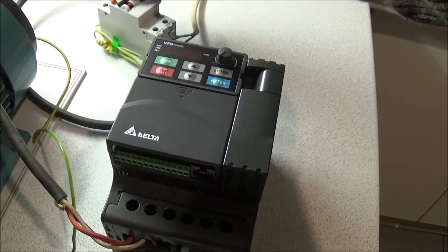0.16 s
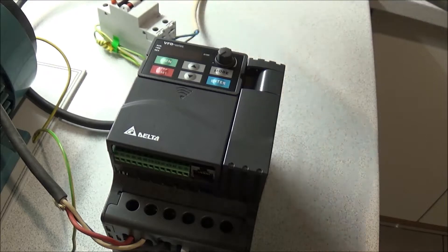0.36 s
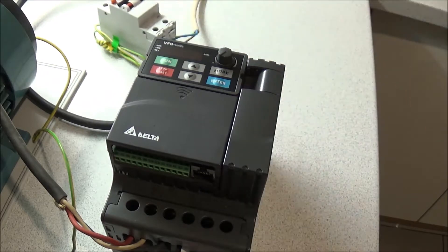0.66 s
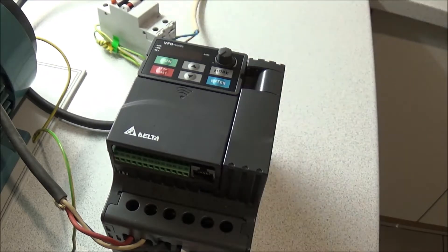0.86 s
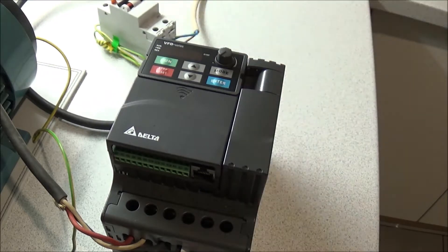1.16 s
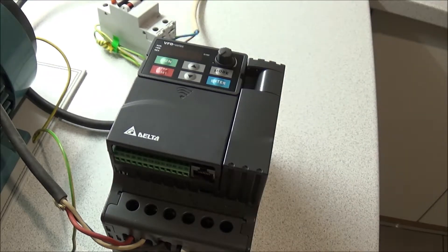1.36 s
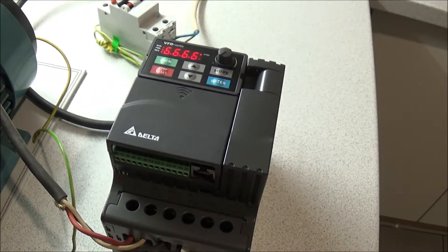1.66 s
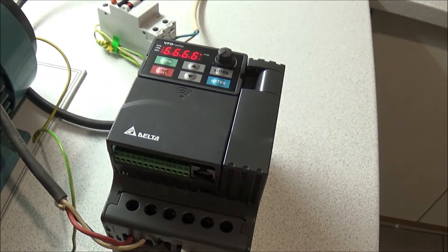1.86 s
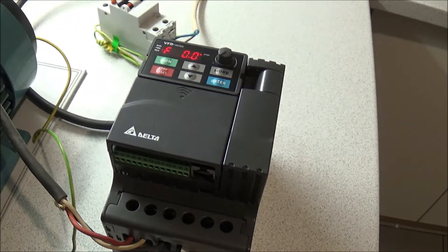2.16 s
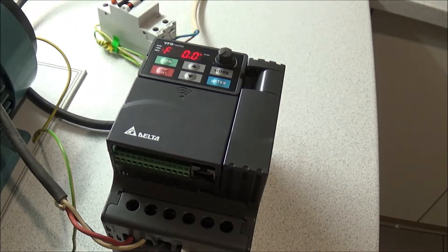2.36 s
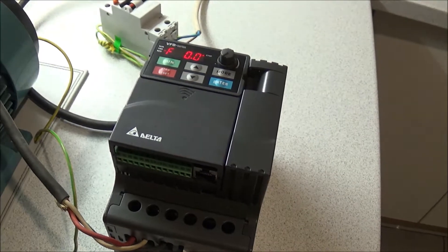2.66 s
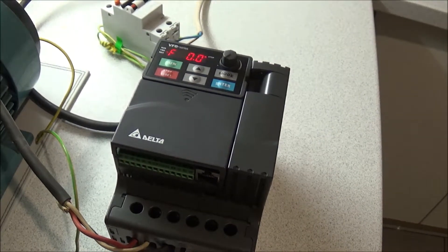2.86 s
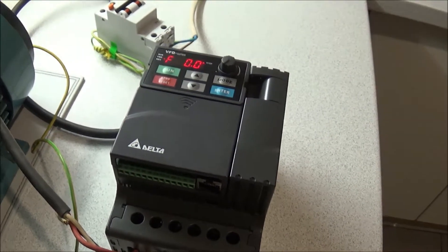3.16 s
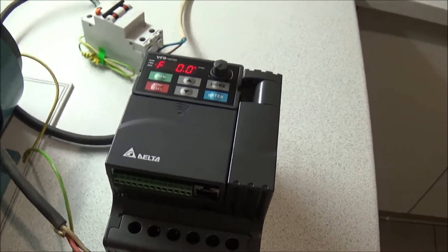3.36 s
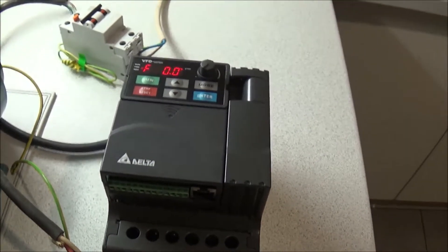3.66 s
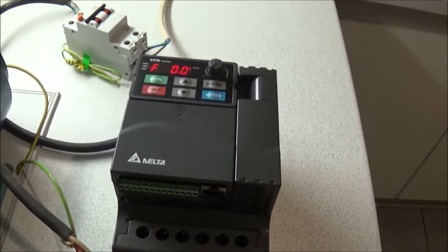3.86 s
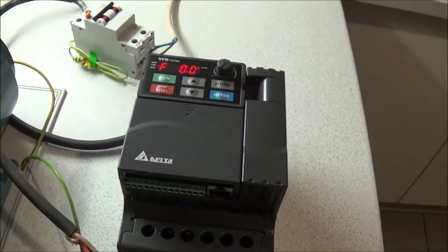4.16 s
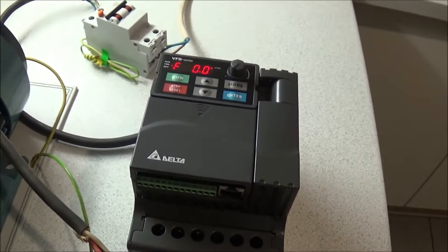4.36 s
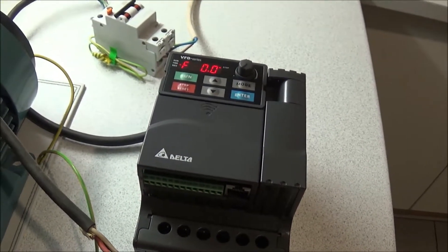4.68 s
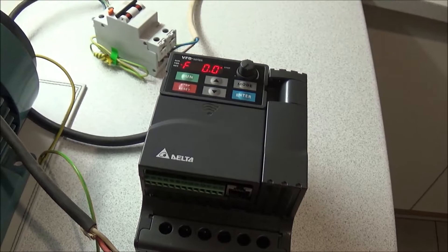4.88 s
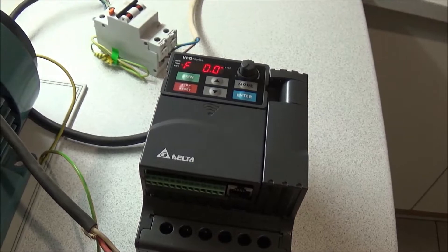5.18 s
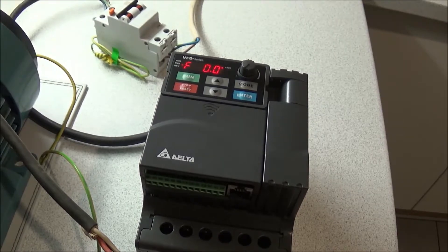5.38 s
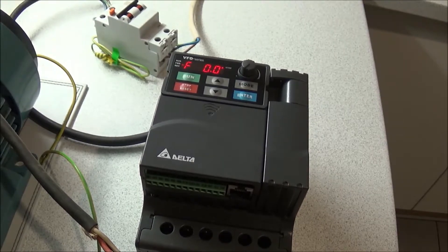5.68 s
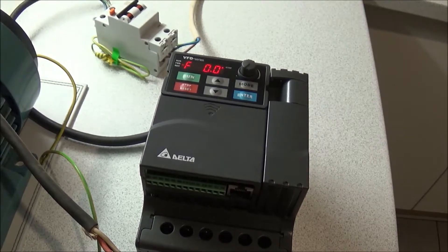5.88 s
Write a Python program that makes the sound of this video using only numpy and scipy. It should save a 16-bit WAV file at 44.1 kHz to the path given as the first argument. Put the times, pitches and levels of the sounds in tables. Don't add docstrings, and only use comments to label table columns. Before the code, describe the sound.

A handheld stereo microphone listens close to a bench in a hard-walled workshop. At 0 s the echo of a breaker snap is already dying, mostly gone within a second, leaving soft hiss and a very faint hum. At about 1.93 s a relay clacks: a hard, bright metallic-plastic click with several bounces inside 15 milliseconds and a short ringing echo. From about 2.1 s a small fan spins up, pitch gliding quickly then flattening near 640 Hz by 4-5 s, with a faint buzz early on and turbulent hiss growing. A light hollow knock comes at 2.63 s. From 2.95 to 3.5 s the grip stutters in rapid ticks and jolts, then heavier bumps and low rumble until 3.95 s. The fan holds steady, slowly nearer, with sharp ticks around 4.5 and 4.75 s, bumps at 4.6 and 5.6 s, and a loud tick at 5.94 s.

```python
import sys
import numpy as np
from scipy import signal
from scipy.io import wavfile
from scipy.ndimage import uniform_filter1d

SR = 44100
rng = np.random.default_rng(int(sys.argv[2]) if len(sys.argv) > 2 else 0)


def level_to_linear(level):
    exponent = np.asarray(level, float) / 20
    return 10 ** exponent


def wrap_up_sound(samples):
    columns = np.atleast_2d(samples).T
    tamed = np.clip(columns, -1, 1)
    steps = np.round(tamed * 32767).astype(np.int16)
    wavfile.write(sys.argv[1], SR, steps)


N = 265790
TIME = np.arange(N) / SR

# frequency in Hz, likeness from 0 to 1.
ROOM_SAME = [(60, 0.81), (150, 1), (380, 0.6), (950, 0.81), (2380, 0.79), (5980, 0.74), (15000, 1)]
# start in seconds, peak level in dB.
RELAY_BLOWS = [
    (1.9262, -33),
    (1.9281, -11),
    (1.9292, -2.5),
    (1.9321, -8.5),
    (1.9338, -15),
    (1.9362, -11),
    (1.9385, -19),
    (1.9404, -18),
]
# time in seconds, level in dB.
NEAR = [(2.2, -3), (3.3, -4.5), (4.14, -2.5), (4.45, -1.5), (4.75, -0.85), (5.4, -0.3), (6.03, 0)]
# start in seconds, tick level in dB, jolt level in dB, jolt pitch in Hz.
SLIPS = [(2.948, -60, -33, 226), (3.004, -37, -40, 208), (3.061, -35, -35, 241), (3.107, -31.5, -24, 294),
         (3.153, -34, -34, 207), (3.198, -51.5, -35, 191), (3.252, -37, -29, 229), (3.296, -30, -25, 218),
         (3.345, -31.5, -27, 292), (3.388, -29, -23.5, 202), (3.43, -30, -24, 205), (3.472, -35, -25, 162)]


def evened(x):
    return x / np.sqrt(np.mean(x ** 2) + 1e-20)


def read(points, hz):
    f, value = np.transpose(points)
    return np.interp(np.log(hz + 1), np.log(f + 1), value)


def lifted(bands, hz):
    return sum(db / (1 + (2 * (hz - f) / width) ** 2) for f, width, db in bands)


def played(table, column):
    s, db = np.transpose(table)[[0, column]]
    return level_to_linear(np.interp(TIME, s, db)) * np.clip((TIME - s[0]) / 0.13, 0, 1)


def add(mix, s, sound):
    part = mix[..., max(round(s * SR), 0):][..., :sound.shape[-1]]
    part += sound[..., :part.shape[-1]]


def band(x, lo_hz, hi_hz):
    edges = [lo_hz, min(hi_hz, SR / 2.2)]
    return signal.sosfilt(signal.butter(2, edges, "band", fs=SR, output="sos"), x)


def wander(top_hz):
    smooth = signal.butter(2, top_hz, fs=SR, output="sos")
    return evened(signal.sosfiltfilt(smooth, rng.standard_normal(N)))


def noise(colour_db, same, size, lead=0, patchy_db=0):
    frames = 4 * N // size + 5
    hz = np.fft.rfftfreq(size, 1 / SR)[:, None]
    a, b, c, d, patches = rng.standard_normal((frames, len(hz), 5)).T
    patches = evened(uniform_filter1d(uniform_filter1d(patches, 9, 0), 11, 1))
    like = np.clip(read(same, hz), -1, 1)
    lag = read(lead, hz) if lead else 0
    left = a + 1j * b
    right = like * left * np.exp(-1j * lag) + np.sqrt(1 - like ** 2) * (c + 1j * d)
    gain = level_to_linear(colour_db(hz, np.arange(frames) * size / 4 / SR)) * np.ones(frames)
    gain /= np.sqrt(1.5 * (gain ** 2).sum(0).max())
    spectra = np.array([left, right]) * gain * level_to_linear(patchy_db * patches)
    return signal.istft(spectra, nperseg=size, noverlap=3 * size // 4)[1][:, :N]


def echo(s, db, colour, bands, t60):
    def colour_db(hz, t):
        return read(colour, hz) + lifted(bands, hz) - 60 * np.maximum(t - s, 0) / read(t60, hz)

    onset = np.sin(np.pi / 2 * np.clip((TIME - s) / 0.0025, 0, 1)) ** 2
    return level_to_linear(db) * noise(colour_db, ROOM_SAME, size=1024) * onset


def ring(modes):
    t = np.arange(4000) / SR
    swing_in = (1 - np.exp(-t / .00035)) ** 2
    return swing_in * sum(level_to_linear(db - 60 * t / t60) * np.sin(2 * np.pi * hz * t) for hz, db, t60 in modes)


def crunch(seconds):
    size = round(seconds * SR)
    main = np.arange(size) == size // 2
    return main + .15 * signal.windows.hann(size) * rng.standard_normal(size)


def struck(modes, seconds, lo_hz, hi_hz):
    sound = np.convolve(crunch(seconds), ring(modes))
    sound = band(band(sound, lo_hz, hi_hz), lo_hz, hi_hz)
    return sound / abs(sound).max()


def blade_hz(t):
    start_s, top_hz, spin_up_s, sag_hz_per_s = 2.061, 642.2, .5516, 1.08
    since = np.maximum(t - start_s, .01)
    return top_hz * (1 - np.exp(-since / spin_up_s)) - sag_hz_per_s * since


def speed_db(t):
    return 20 * np.log10(blade_hz(t) / blade_hz(TIME[-1]))


def settling_db(hz, t):
    dip_db, length_s, edge_hz = -4.5, .8, 1500
    since = t - np.array([[0], [RELAY_BLOWS[1][0]]])
    dips = np.exp(-(since / length_s) ** 4) * (since >= 0)
    return dip_db * dips.sum(0) / (1 + (edge_hz / (hz + 1)) ** 2)


def room():
    # frequency in Hz, level in dB.
    far_hum = [(48.4, -66), (118.4, -74), (172.3, -72), (199.2, -68), (301.5, -70)]
    # frequency in Hz, density in dB per Hz.
    air_colour = [(15, -30), (30, -11), (60, -20), (140, -15), (200, -11), (260, -18), (500, -16),
                  (800, -20), (1700, -21.5), (3500, -25.5), (8000, -26), (10500, -29.5), (15700, -38)]
    hum = 0
    for hz, db in far_hum:
        hum += np.sqrt(2) * level_to_linear(db + hz / 90 * wander(2.5)) * np.sin(2 * np.pi * hz * TIME)

    def colour_db(hz, t):
        return read(air_colour, hz) + settling_db(hz, t)

    return level_to_linear(-49) * noise(colour_db, ROOM_SAME, size=2048, patchy_db=.7) + hum


def breaker_echo():
    # frequency in Hz, density in dB per Hz.
    snap_colour = [(24, -61), (40, -36), (103, -35), (129, -28), (193, 2.5), (267, -15), (335, -7.5),
                   (566, -5), (610, -2), (1000, -6), (1110, -0.5), (2530, -23), (8200, -28), (14200, -56),
                   (15700, -66)]
    # frequency in Hz, width in Hz, lift in dB.
    snap_bands = [(1200, 200, 2.6), (1760, 300, 2.6), (2040, 340, 2.5), (4930, 270, 2.8)]
    # frequency in Hz, time to fall by 60 dB in seconds.
    snap_t60 = [(60, 0.67), (250, 0.68), (800, 0.76), (1250, 0.79), (2000, 0.94), (3000, 0.96),
                (8000, 0.55), (15000, 0.46)]
    return echo(-.01, -17.5, snap_colour, snap_bands, snap_t60)


def shell_ticks():
    # start in seconds, peak in dB, centre in Hz, width in Hz.
    single_ticks = [
        (.145, -43, 4170, 590),
        (2.3137, -46, 3580, 2400),
        (2.3146, -51, 8000, 6000),
        (2.6534, -42, 3380, 1800),
        (2.6545, -55, 6500, 4000),
        (3.824, -31, 3000, 2500),
                    (1.6615, -48, 10800, 8000),
        (2.6355, -40, 4900, 8100),
        (2.871, -40.5, 9300, 5000),
        (4.482, -24.5, 8500, 2500),
        (4.741, -26, 9000, 2500),
        (5.128, -40, 13600, 2500),
        (5.943, -19.5, 8700, 3480),
        (5.985, -26, 6600, 3500),
        (5.906, -34, 7500, 5000),
    ]
    slip_ticks = [(s + .0008, db, 3000, 3500) for s, db, *_ in SLIPS]
    fizz = [(s, db - 8.5, 7500, 4300) for s, db, *_ in slip_ticks]
    snap = (1 - np.exp(-TIME[:400] / .0005)) * np.exp(-TIME[:400] / .0013)
    out = np.zeros(N)
    for s, db, hz, width in slip_ticks + fizz + single_ticks:
        lo_hz, hi_hz = max(hz - width / 2, 900), hz + width / 2
        tick = band(rng.standard_normal(400) * snap, lo_hz, hi_hz)
        tick = band(tick, lo_hz, hi_hz)
        add(out, s, level_to_linear(db + 5.0) * tick / abs(tick).max())
    return out


def relay():
    # frequency in Hz, level in dB, time to fall by 60 dB in seconds.
    relay_modes = [(900, -28, .03), (1250, -21, .014), (1500, -20, .016), (1800, -19, .016),
                   (2150, -19, .016), (2570, -19, .022), (3400, -23, .01), (4550, -20, .014),
                   (5500, -22, .008), (6300, -15, .012), (7400, -12, .006), (8350, 0, .0075),
                   (9200, -6, .006), (10340, 0, .006), (12000, -13, .005)]
    case_modes = [(704, -48, .12), (807, -47, 0.18), (875, -38, .35), (944, -35, 0.24), (965, -46, 0.18)]
    # frequency in Hz, density in dB per Hz.
    echo_colour = [(240, -58), (400, -32), (849, -9.5), (1120, -14), (1230, -11.5), (1770, -18),
                   (2640, -18.5), (3880, -22), (4600, -12.5), (5280, -23), (6150, -5.5), (7510, -16),
                   (8370, -17.5), (13500, -17), (15700, -25)]
    # frequency in Hz, width in Hz, lift in dB.
    echo_bands = [(900, 150, 3), (2500, 220, 2), (4600, 250, -1), (6360, 270, -6), (7800, 600, 0.5),
                  (8500, 620, 7), (9300, 500, 7), (10000, 480, 7.5)]
    # frequency in Hz, time to fall by 60 dB in seconds.
    echo_t60 = [(500, 0.2), (900, 0.81), (1400, 0.53), (2600, 0.77), (3600, 0.38), (4600, 0.69),
                (6300, 0.51), (8400, 0.7), (14000, 0.16)]
    direct = np.zeros(N)
    for s, db in RELAY_BLOWS:
        add(direct, s, level_to_linear(db) * struck(relay_modes, .0005, 700, 12000))
    since = np.maximum(TIME - RELAY_BLOWS[2][0], 0)
    boom = sum(level_to_linear(db - 60 * since / t60) * np.sin(2 * np.pi * hz * since) for hz, db, t60 in case_modes)
    direct += (1 - np.exp(-since / .008)) * boom
    sides = np.array([direct * 1.3, np.roll(direct, shift=1) * .3 + direct * .9])
    return sides + echo(RELAY_BLOWS[1][0], -24.5, echo_colour, echo_bands, echo_t60)


def supply():
    start_s, idle_db, load_db = 1.95, -67.5, 11
    level = level_to_linear(idle_db + load_db * level_to_linear(6 * speed_db(TIME))) * np.clip((TIME - start_s) / .1, 0, 1)
    return level * evened(band(rng.standard_normal(N), 6020, 6450))


def motor_buzz():
    # time in seconds, level in dB.
    buzz_level = [(2.0, -63), (2.3, -62.5), (2.6, -52.5), (3.0, -45.5), (3.4, -47), (3.8, -43)]
    # frequency in Hz, width in Hz, level in dB.
    windings = [(1663, 135, 1), (835, 440, 1), (2750, 240, -6.5)]
    shake = rng.standard_normal(N)
    buzz = sum(level_to_linear(db) * evened(band(shake, hz - w / 2, hz + w / 2)) for hz, w, db in windings)
    return played(buzz_level, column=1) * evened(buzz)


def fan_tones():
    # multiple of the blade rate, level in dB at full speed, power of speed it grows with.
    blade_tones = [(1, -33.5, 5.6), (2, -56.5, 2.8), (3, -53.5, 4.5), (4, -58.5, 4.6)]
    # multiple of shaft turns, level in dB at full speed.
    shaft_orders = [(1, -52), (3, -54), (9, -48), (11, -49), (12, -46), (29, -55), (42, -48.5), (56, -53.5)]
    # frequency in Hz, width in Hz, lift in dB.
    outlet = [(555, 57, 6.5), (661, 130, 12.5), (980, 224, 9.5), (1140, 110, 7.5), (1747, 198, 18),
              (1929, 280, 13), (2220, 200, 2.5), (2537, 81, 15)]
    outlet_narrow = [(1249, 9, -14), (1266, 36, 14), (2400, 40, 7), (2455, 30, -13), (2503, 14, 5),
                     (2514, 8, -7)]
    nulls = [(559.3, 2.5, -14), (576.8, 2, -12), (596, 2.5, -10), (611.2, 1.5, -8), (615.3, 1, -5),
             (631.5, 5, -2.5)]
    hz = blade_hz(TIME)
    turns = np.cumsum(hz) / SR + 0.0026 * wander(25)
    near_db = np.interp(TIME, *np.transpose(NEAR))
    flutter_db = [0.52, 1.6, 1.3, 2.4]
    lead_rad, lean_db = [-.1, 0.46, 0.071, 0.2], [1., 1, 0.89, 0.22]
    side = np.array([[1], [-1]])
    out = np.zeros((2, N))
    for k, (_, db, power) in enumerate(blade_tones):
        path_db = near_db + lifted(outlet + outlet_narrow + nulls, (k + 1) * hz)
        level_db = db + power * speed_db(TIME) + path_db
        size = np.sqrt(2) * level_to_linear(level_db + flutter_db[k] * wander(22) + side * lean_db[k])
        out += size * np.sin(2 * np.pi * (k + 1) * turns + side * lead_rad[k] / 2)
    for order, db in shaft_orders:
        level = level_to_linear(db + 8 * speed_db(TIME) + 3.7 * wander(36))
        out += level * np.sin(2 * np.pi * order / 7 * turns)
    return out


def fan_air():
    # frequency in Hz, density in dB per Hz.
    hiss_colour = [(24, -77), (40, -48), (318, -30), (566, -14.5), (641, -9.5), (726, -12), (1170, -26.5),
                   (1260, -17.5), (1500, -18.5), (1880, -17.5), (2350, -25), (2600, -21.5), (5780, -27.5),
                   (9290, -26.5), (15700, -49.5)]
    # frequency in Hz, width in Hz, lift in dB.
    duct = [(173, 22, 14.5), (433, 29, 7.5), (614, 146, -3.5), (1046, 235, 10), (1802, 200, 8),
            (2370, 180, 1.5), (2930, 1060, 2.5), (3350, 200, -4.5), (3576, 90, 6), (3970, 630, 4),
            (4470, 190, 2.5), (6020, 310, -7), (6030, 92, 10.5), (7760, 690, 3), (9400, 650, 4.5)]
    # blade rate in Hz, width in Hz, lift in dB.
    stall = [(573, 47, 4)]
    # frequency in Hz, likeness from 0 to 1.
    air_same = [(60, 1.0), (150, 0.72), (380, 0.79), (950, 0.78), (2380, 0.91), (5980, 0.97), (15000, 1)]
    # frequency in Hz, phase lead in radians.
    air_lead = [(0, -0.031), (860, 0.46), (3100, 0.47), (5250, 0.6), (7840, 0.44), (8100, 0.092),
                (15400, -0.0)]

    def colour_db(hz, t):
        rush_db = -2.5 + lifted(stall, blade_hz(t))
        return read(hiss_colour, hz) + lifted(duct, hz) + rush_db / (1 + (hz / 2300) ** 4)

    air = noise(colour_db, air_same, size=1024, lead=air_lead, patchy_db=0.88)
    level = level_to_linear(-24 + 7.86 * speed_db(TIME) + 0.51 * wander(32)) * played(NEAR, column=1)
    return air * level * level_to_linear([[.6], [-.6]])


def bench():
    # middle in seconds, level in dB, pitch in Hz.
    leans = [
        (3.4, -39.5, 144),
        (3.81, -33, 93),
        (4.07, -47, 160),
        (4.2, -50, 159.5),
        (4.35, -44, 161.7),
        (4.47, -49, 159.4),
        (4.59, -43.5, 160.3),
        (5.25, -44.5, 159.4),
    ]
    mode = evened(band(rng.standard_normal(N), 158.5, 164.4))
    out = level_to_linear(-56 + 5.5 * speed_db(TIME)) * mode
    for s, db, hz in leans:
        swell = np.exp(-((TIME - s) / 0.06) ** 2)
        out += np.sqrt(2) * level_to_linear(db) * swell * np.sin(2 * np.pi * hz * TIME)
    return out


def shell_knock():
    # frequency in Hz, level in dB, time to fall by 60 dB in seconds.
    shell_modes = [(1080, 2, .04), (900, -2, .03), (1400, -4, .015), (1800, -3, .012), (2300, -1, .014),
                   (2900, -4, .012), (3700, -5, .012), (4800, -8, .008), (600, -3, .02), (260, -18, .04)]
    out = np.zeros(N)
    add(out, 2.6352, level_to_linear(-29) * struck(shell_modes, .002, 150, 7000))
    return out


def body_jolts():
    # middle in seconds, peak level in dB, pitch in Hz.
    bumps = [(2.785, -43, 80), (2.991, -38, 72), (2.788, -37, 260), (3.494, -22, 150), (3.535, -31, 71.5),
             (3.551, -23.5, 230), (3.58, -24, 287), (3.611, -27.5, 84.5), (3.632, -30, 240),
             (3.687, -28, 82), (3.685, -31, 193), (3.751, -26, 197), (3.781, -23, 260), (3.819, -18, 230),
             (3.76, -28, 45), (3.862, -22, 172), (3.887, -24, 256), (3.939, -42, 53.6), (4.578, -28, 110),
             (4.594, -24, 159), (4.606, -28, 65), (4.75, -26, 259), (5.587, -37, 201), (5.598, -19, 287),
             (5.888, -31, 226), (5.988, -27, 248), (5.997, -28, 280)]
    jolts = [(s - 0.0043, db, hz) for s, _, db, hz in SLIPS]
    thumps = [(s + 0.0236, -29.5, 72) for s, *_ in SLIPS[1:]]
    moves = jolts + thumps + bumps
    out = np.zeros((2, N))
    for (s, db, hz), (phase, skew) in zip(moves, rng.uniform(0, 2 * np.pi, (len(moves), 2))):
        u = np.arange(-2, 3, hz / SR)
        shape = np.exp(-(u / np.where(u < 0, .5, .9)) ** 2)
        apart = np.array([[1], [-1]]) * np.cos(skew) * min(hz / 300, 1) ** 2
        sag = 0.37 * np.sin(skew) * u ** 2
        add(out, s - 2 / hz, level_to_linear(db - 3.0) * shape * np.cos(2 * np.pi * (u + sag) + phase + apart))
    return out


def grip_rumble():
    # time in seconds, rumble level in dB.
    grip_level = [(2.86, -57), (3.04, -44), (3.16, -44), (3.26, -41), (3.42, -31), (3.64, -41.5),
                  (3.82, -36), (3.95, -61), (4.1, -85)]
    # frequency in Hz, density in dB per Hz.
    grip_colour = [(30, -0.5), (60, -3), (130, -10), (220, -4.5), (400, -11.5), (600, -9.5), (1200, -52)]
    rumble = noise(lambda hz, t: read(grip_colour, hz), ROOM_SAME, size=2048)
    shaken = level_to_linear(-45 + 5.5 * speed_db(TIME))
    return (played(grip_level, column=1) + shaken) * level_to_linear(0.5 + 2.1 * wander(18)) * rumble


def scene():
    drive = relay() + supply() + motor_buzz() + fan_tones() + fan_air()
    handling = shell_ticks() + bench() + shell_knock() + body_jolts() + grip_rumble()
    return room() + breaker_echo() + drive + handling


def low_pass(x):
    return signal.sosfilt(signal.butter(12, 15850, fs=SR, output="sos"), x)


def record(dry):
    mid, side = (dry[0] + dry[1]) / 2, (dry[0] - dry[1]) / 2
    mid = signal.sosfilt(signal.butter(4, 34, "high", fs=SR, output="sos"), mid)
    side = signal.sosfilt(signal.butter(2, 110, "high", fs=SR, output="sos"), side)
    edge = signal.firwin(511, 15800, window=("kaiser", 9), fs=SR)[None]
    mix = signal.oaconvolve(np.array([mid + side, mid - side]), edge, "same")
    return low_pass(mix)


dry = scene()
out = record(dry)
wrap_up_sound(out)
```